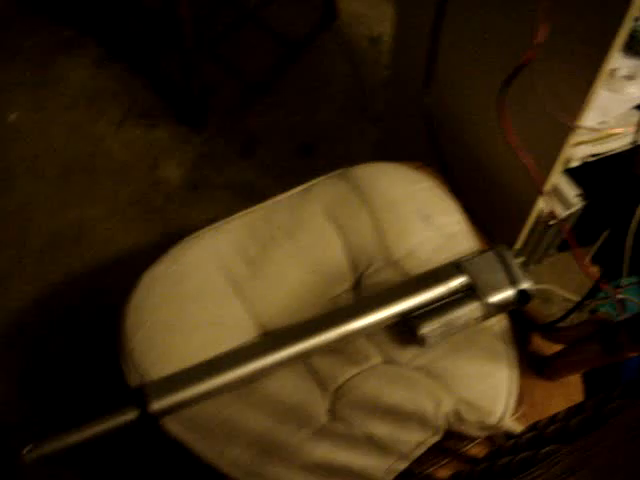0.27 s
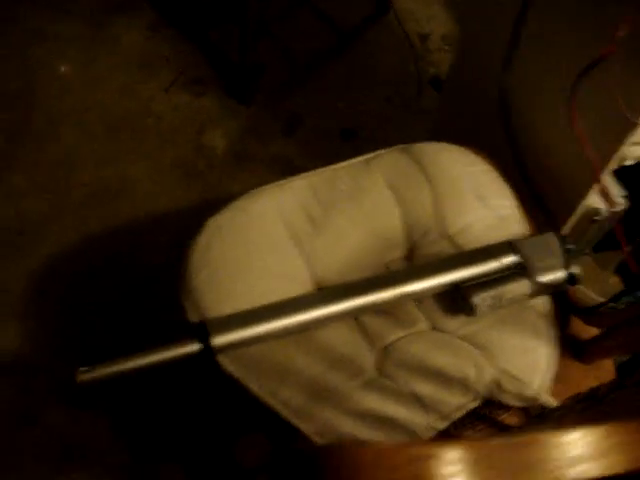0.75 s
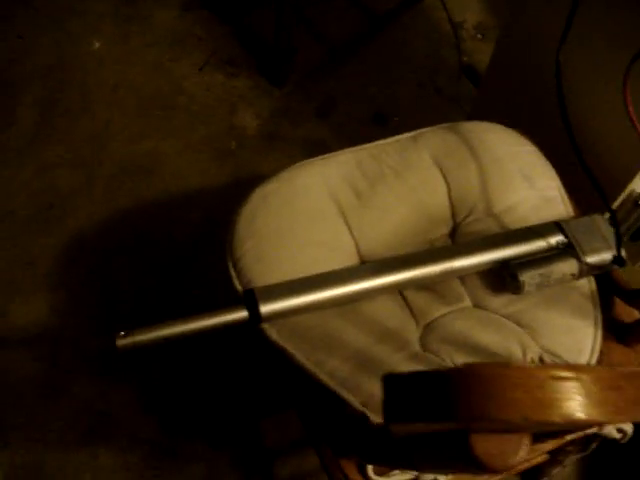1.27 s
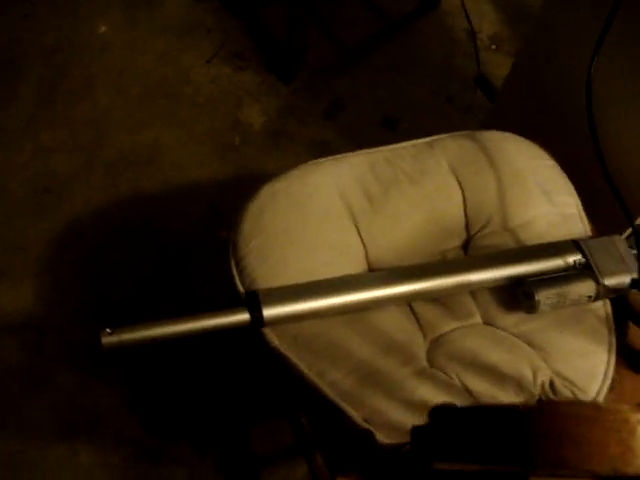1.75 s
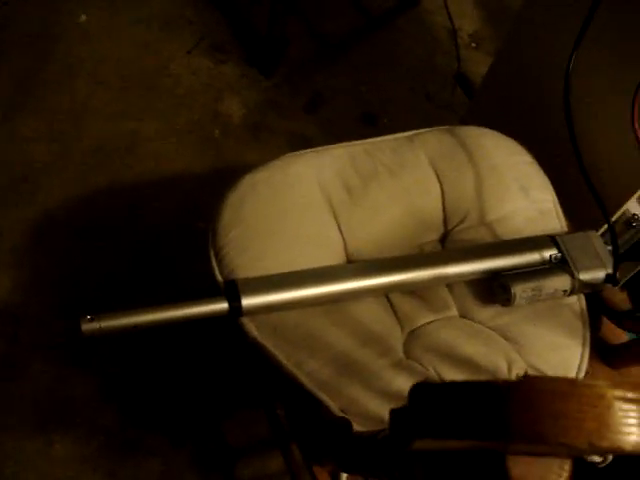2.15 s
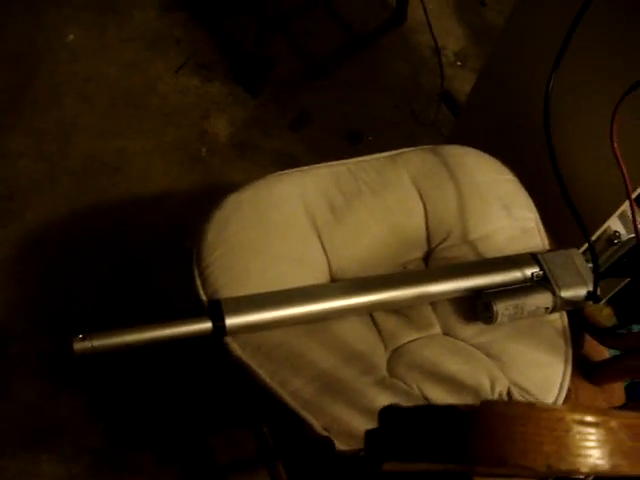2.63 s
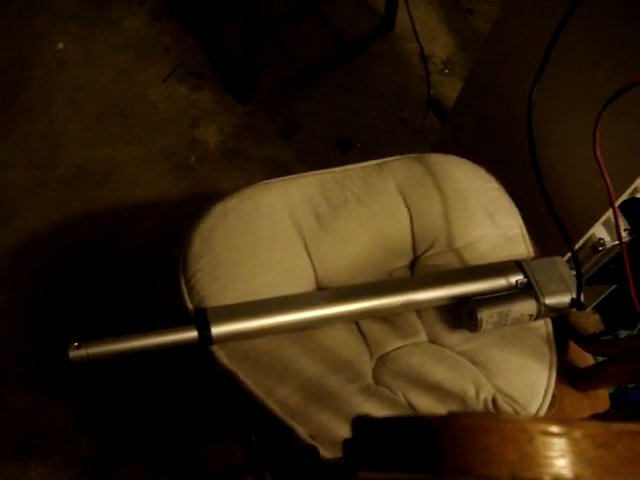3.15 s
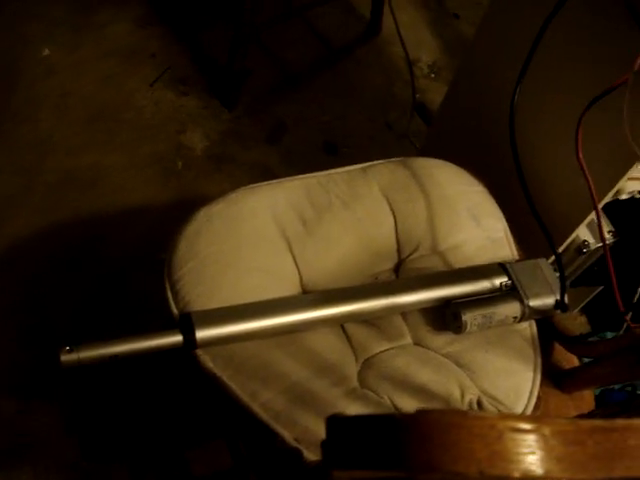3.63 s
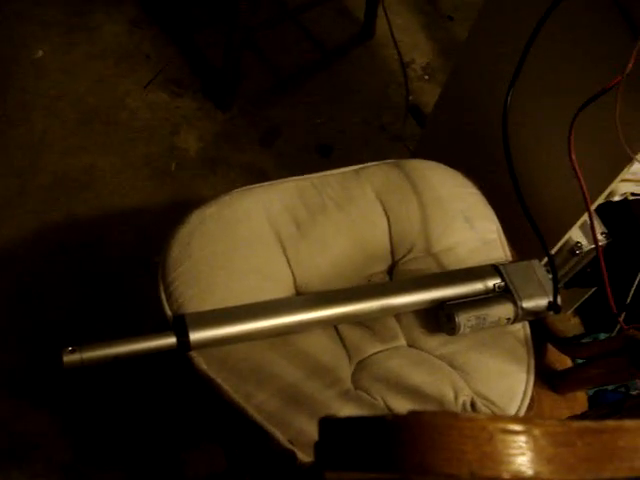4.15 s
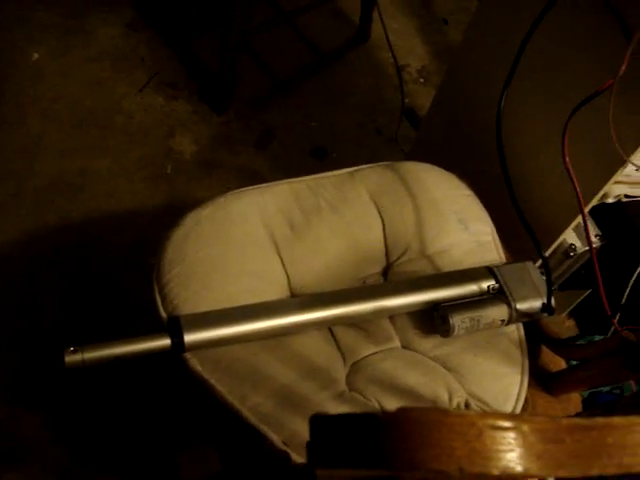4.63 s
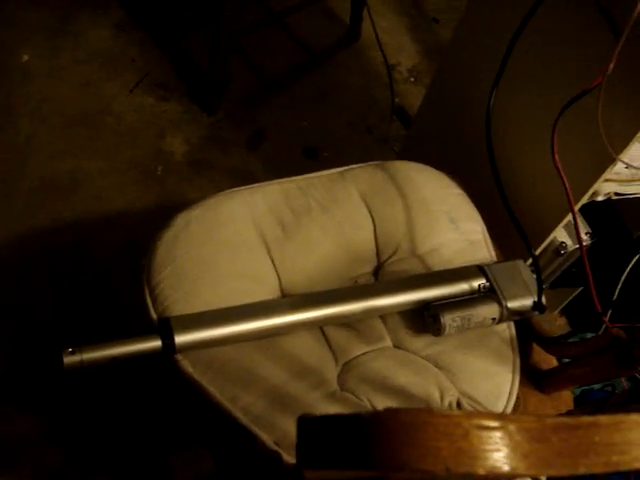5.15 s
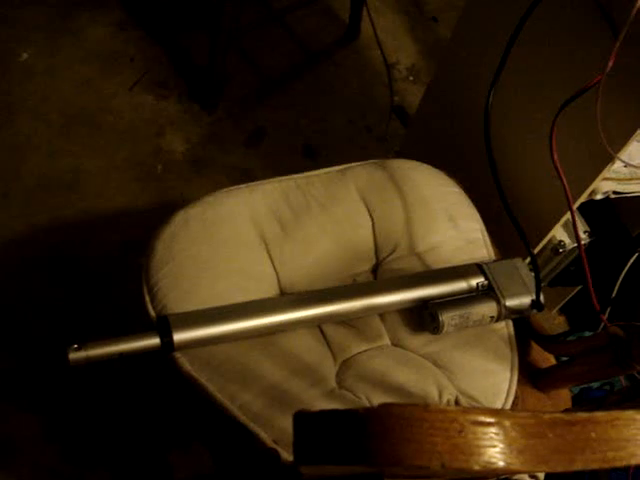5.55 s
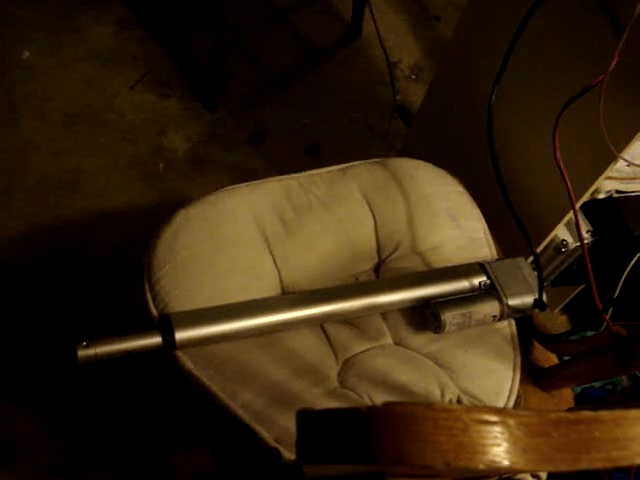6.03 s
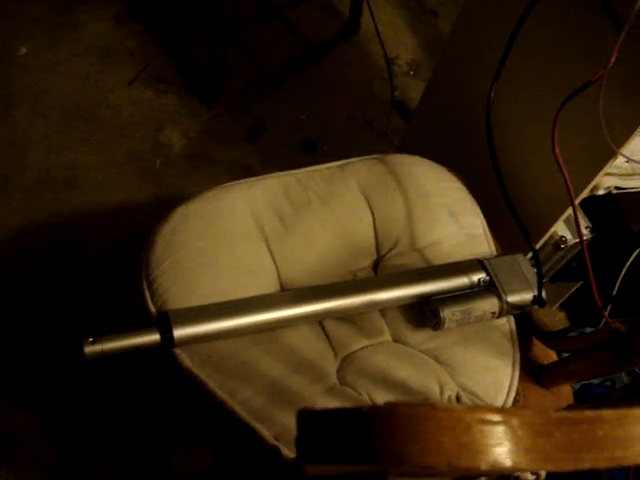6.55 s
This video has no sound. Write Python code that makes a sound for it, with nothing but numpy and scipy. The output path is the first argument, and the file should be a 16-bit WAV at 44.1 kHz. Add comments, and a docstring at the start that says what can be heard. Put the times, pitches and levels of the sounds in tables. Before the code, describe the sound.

From the start, a small electric motor and gear train runs close by indoors, already at full speed. Its shrill, buzzy whine has a strong steady tone near 2.4 kHz, brighter tones above, and a fine metallic rattle from housing and tube. Over the first two seconds its colour and strength shift as the hand-held microphone moves; very soft handling bumps fall near 0.4, 0.9 and 1.1 s. At 1.96 s a switch clacks, two short hard contacts almost together with a slight room echo. The level dips for an instant and the pitch sags minutely, then climbs slightly above before. From about 2.1 s to the end at 7 s the reversed motor whirs continuously, less shrill, with a drone around 600 Hz and a gentle throb five times a second. Two faint, tiny high squeaks come at 5.8 and 6.0 s. Low room rumble lies underneath throughout.

```python
"""A linear actuator on a padded stool indoors pushes its rod out: the motor and gears whine on shaft orders,
and tooth bumps that repeat with each part's turns rattle through housing and tube. Soft bumps of handling.
At 1.96 s a switch clacks in two ringing contacts; the level dips briefly and the shaft speed sags, then climbs.
The rod comes in on the other flanks: slightly faster, less shrill, with a throb once a turn of the screw.
Late on, two faint squeaks of the rod. Room rumble throughout; a hand-held microphone, both channels alike."""
import sys
import numpy as np
from scipy import signal
from scipy.fft import rfft, irfft, next_fast_len
from scipy.io import wavfile
from scipy.ndimage import map_coordinates

SR = 44100
rng = np.random.default_rng(int(sys.argv[2]) if len(sys.argv) > 2 else 0)


def to_wav(sig):
    """Store sig (one row per channel, or 1-D mono) as 16-bit WAV at the path in sys.argv[1].

    Samples outside -1..1 are clipped; the rate is SR.
    """
    pcm = np.clip(np.atleast_2d(sig), -1, 1) * 32767
    pcm = np.round(pcm).astype(np.int16)
    wavfile.write(sys.argv[1], SR, pcm.T)  # frames by channels


N = 299468

# whine of gears and commutator, before trims: (multiple of shaft speed [-], relative level [dB])
OUT_HOUSING_TONES = [(8, -68.5), (12, -66), (16, -64.5), (20, -66), (24, -58.5), (26, -71), (30, -62.5),
                     (34, -64.5), (36, -55.5), (37, -62), (51, -62), (54, -59), (55, -60), (58, -53.5),
                     (59, -54), (60, -47)]
OUT_TUBE_TONES = [(72, -64), (78, -60.5), (94, -60), (98, -56.5), (100, -58), (110, -55), (112, -51),
                  (113, -54.5), (120, -63), (168, -60), (169, -61)]
IN_TONES = [(4, -75), (6, -70.5), (8, -72.5), (9, -69), (10, -78.5), (16, -61), (24, -59.5), (27, -61.5),
            (29, -68.5), (30, -62), (32, -57.5), (32.8, -70.5), (35, -59), (36, -53.5), (42, -65.5),
            (46, -61), (49, -64), (52, -57), (54, -56.5), (55, -58.5), (56, -55), (59, -58), (64, -62.5),
            (67, -58.5), (72, -53.5), (82, -62.5), (84, -63), (89.2, -56), (92, -59), (96, -56), (109, -63),
            (112, -55), (120, -60.5), (126, -63), (147, -64), (151, -70), (166, -59.5), (184, -69)]
IN_DRONE_TONES = [(12, -57.5), (13.2, -60)]
# spectrum of each part: (frequency [Hz], relative density [dB])
OUT_GEARBOX_COLOUR = [(200, -14.5), (400, -10.5), (750, -6.5), (1100, -9), (1450, -6.5), (1800, -2),
                      (2050, -8.5), (2230, -13), (2400, -21)]
OUT_HOUSING_COLOUR = [(2150, -31), (2330, -15), (2600, -6), (2850, -6), (3020, -1), (3130, -4.5),
                      (3260, -15), (3450, -24)]
# the tube's spectrum in three directions, in order of time: (frequency [Hz], relative density [dB])
OUT_TUBE_START_COLOUR = [(3000, -22), (3400, -5), (3800, -7.5), (4300, -2.5), (4650, -12), (5050, -6),
                         (5550, 2), (6200, -8.5), (7100, -9), (8000, -9.5), (8600, 0), (9300, -8),
                         (10000, -11.5)]
OUT_TUBE_SWING_COLOUR = [(3000, -25), (3400, -10.5), (3900, -8), (4300, -6.5), (4750, -1.5), (5200, -4.5),
                         (5450, -2.5), (5650, 3.5), (5850, -5), (6300, -5.5), (6900, -14), (7450, -6),
                         (8150, -13), (9600, -7), (10000, -15)]
OUT_TUBE_SIDE_COLOUR = [(3000, -17), (3400, -5), (3800, -10), (4200, -5.5), (4600, -4.5), (5700, -1.5),
                        (6800, -8.5), (7350, -2), (7850, -9.5), (8400, -3.5), (9100, -4), (10000, -9.5)]
# spectra coming in, and of the room rumble: (frequency [Hz], relative density [dB])
IN_GEARBOX_COLOUR = [(200, -29.5), (420, -15), (800, -12), (1100, -12), (1350, -9.3), (1600, -5.5),
                     (1900, -5.5), (2100, -9.5), (2250, -15), (2450, -8), (2650, -1), (3000, -2),
                     (3100, -10.5), (3400, -19.5)]
IN_TUBE_COLOUR = [(2900, -30), (3200, -9.5), (3400, 0), (3750, -1.5), (4150, -3), (4450, 2), (5200, -1.5),
                  (5700, 2.5), (6100, -5.5), (6800, -5.5), (7350, 0.5), (7900, -7.5), (8700, -7),
                  (9400, -3), (10000, -10.5)]
IN_DRONE_COLOUR = [(480, -50), (570, -22), (610, 7), (670, -3), (710, -0.5), (820, -33)]
ROOM_COLOUR = [(20, -26), (40, -12.5), (60, -8.5), (72, -12.5), (85, -0.5), (102, 0.5), (118, -6),
               (170, -5.5), (280, -4.5), (450, -6.5), (1000, -11.5), (4000, -43)]
# switch contacts: (time [s], relative level [dB], pitch [Hz], t60 [s])
SWITCH_CONTACTS = [(1.956, -31, 1450, 0.035), (1.9718, -30, 1295, 0.026)]
# switch body modes: (ratio to pitch [-], relative level [dB])
SWITCH_BODY_MODES = [(.27, -14), (.44, -8.5), (.66, -6.5), (1, -2), (1.15, -12)]
# soft handling bumps: (time [s], peak level [dB], pitch [Hz])
HANDLING_BUMPS = [(.36, -54.5, 430), (.37, -59, 219), (.86, -58, 262), (1.06, -54, 393)]
# squeaks of the sliding rod: (time [s], peak level [dB], pitch [Hz])
ROD_SQUEAKS = [(5.795, -48, 3440), (5.995, -42, 3480)]
# housing ring going out, before trims: (time [s], relative level [dB])
OUT_HOUSING_LEVEL = [(0, -42), (.55, -39.3), (.9, -43), (1.12, -42.5), (1.45, -41), (1.95, -41.5)]
# tube rattle going out, before trims: (time [s], relative level [dB])
OUT_TUBE_LEVEL = [(0, -40.5), (.25, -40), (.62, -37), (1.0, -38), (1.28, -39.5), (1.95, -39.5)]
# strongest mesh tone going out, through nulls as the microphone moves: (time [s], level [dB])
OUT_MESH_LEVEL = [(0, -46), (.19, -57), (.33, -49.5), (.68, -50.5), (.93, -45.5), (1.28, -43.5),
                  (1.52, -50), (1.95, -49.5)]

REVERSE_S = 1.955
OUT_HZ, IN_HZ = 50.14, 50.665  # shaft speed each way
SAG_HZ, SAG_AFTER_S, SAG_S = .45, .045, .04
CLIMB_AFTER_S, CLIMB_S = .11, .05
MESH_ORDER, SCREW_TURNS = 48, 10  # tooth contacts per shaft turn, shaft turns per screw turn
BIND_OUT_S, BIND_IN_S = 1.02, 4.17  # the screw binds once a turn: one such moment each way
BIND_OUT_DB = .5  # swell of the tube at each bind
SEAT_S, MESH_SEAT_S = .084, .14  # tones firm up as the teeth seat on their new flanks
DIP_DB, DIP_S = 2, .01
ECHO_DB, ECHO_T60_S = -19, .25
TOP_HZ = 10080


def actuator():
    """One shaft drives everything; at the reversal the load changes flanks and the level dips briefly."""
    turns = shaft()
    in_share = .5 + .5 * np.tanh((clock() - REVERSE_S) / .0074)
    second_contact_s = SWITCH_CONTACTS[1][0]
    dip = np.exp(-((clock() - second_contact_s) / DIP_S) ** 2)
    return amp(-DIP_DB * dip) * ((1 - in_share) * pushing(turns) + in_share * pulling(turns))


def pushing(turns):
    """Rod going out: housing and tube ring brightly, changing as the microphone moves round them."""
    housing_db, = curves(OUT_HOUSING_LEVEL)
    tube_db, = curves(OUT_TUBE_LEVEL)
    tube_db = tube_db + BIND_OUT_DB * np.cos(screw_angle(turns, BIND_OUT_S))
    mesh_db, = curves(OUT_MESH_LEVEL)
    teeth = rattle(turns, OUT_HOUSING_TONES + OUT_TUBE_TONES, pinion_db=-7.5, wheel_db=-7.5,
                   screw_db=-13, loose_db=2.5, bite_db=1.5)

    gearbox = amp(-50 + .7 * wobble(9.04)) * coloured(teeth, OUT_GEARBOX_COLOUR)
    housing = amp(housing_db - 4) * coloured(teeth, OUT_HOUSING_COLOUR)
    housing_trim_db = .75 * (housing_db - housing_db.mean()) - .5
    housing_tones = amp(housing_trim_db) * whine(turns, OUT_HOUSING_TONES, waver_db=1.6)

    # the tube radiates a different colour in each direction
    start = np.interp(clock(), [.25, .62], [1, 0])
    side = np.interp(clock(), [1.25, 1.7], [0, 1])
    tube = start * coloured(teeth, OUT_TUBE_START_COLOUR)
    tube += (1 - start - side) * coloured(teeth, OUT_TUBE_SWING_COLOUR)
    tube += side * coloured(teeth, OUT_TUBE_SIDE_COLOUR)
    tube *= amp(tube_db - .47 + .55 * wobble(29.9))
    tube_trim_db = 1.45 * (tube_db - tube_db.max()) + 2.5
    tube_tones = amp(tube_trim_db) * whine(turns, OUT_TUBE_TONES, waver_db=1)

    return gearbox + housing + housing_tones + amp(mesh_db) * mesh(turns) + tube_tones + tube


def pulling(turns):
    """Rod coming in: the gearbox drones and throbs once a turn of the screw."""
    teeth = rattle(turns, IN_TONES + IN_DRONE_TONES, pinion_db=-9, wheel_db=-4.5,
                   screw_db=-9.5, loose_db=-2, bite_db=1.2)
    screw = screw_angle(turns, BIND_IN_S)
    oval = np.cos(4 * screw)  # the slightly oval wheel binds twice in each of its turns

    gearbox_db = settling(first=-42, final=-47.5, lag_s=.092) + .13 * oval
    gearbox = amp(gearbox_db) * coloured(teeth, IN_GEARBOX_COLOUR)
    tube_db = settling(first=-45.9, final=-42.5, lag_s=.7) + 1.04 * oval + .41 * wobble(25)
    tube = amp(tube_db) * coloured(teeth, IN_TUBE_COLOUR)

    hum = whine(turns, IN_DRONE_TONES, waver_db=.5)
    hum += amp(-60.5) * coloured(rng.standard_normal(N), IN_DRONE_COLOUR)
    throb_db = -1.3 * np.cos(screw) - np.cos(2 * screw)
    drone = amp(settling(first=-1.1, final=.6, lag_s=1.6) + throb_db) * hum
    singing = amp(-.54) * whine(turns, IN_TONES, waver_db=.73)
    tones = settling(0, .99, SEAT_S) * (drone + singing)

    mesh_gain = settling(0, 1, MESH_SEAT_S) * amp(settling(first=-47, final=-55, lag_s=1.2))
    return gearbox + tube + mesh_gain * mesh(turns) + tones


def rattle(turns, tones, pinion_db, wheel_db, screw_db, loose_db, bite_db):
    """Pinion, wheel and screw repeat their bumps each turn; backlash adds chance, the load pulses."""
    pinion = amp(pinion_db) * flanks(turns, tones, count=1)
    wheel = amp(wheel_db) * flanks(turns, tones, count=5)
    screw = amp(screw_db) * flanks(turns, tones, count=10)
    backlash = amp(loose_db) * rng.standard_normal(N)
    pulses = [np.cos(2 * np.pi * (order * turns + rng.random())) for order in (1, 2, 3, 6, 12)]
    load = unit(sum(pulses))
    return (pinion + wheel + screw + backlash) * amp(bite_db * load)


def flanks(turns, tones, count):
    """Uneven teeth of a part turning once in count shaft turns: its orders up to 220, less the strong tones."""
    size = 4096 * count  # points round the part
    k = np.arange(220 * count)
    # orders compared in fifths, the turn of the gear wheel
    strong = np.round(5 * np.r_[np.array(tones)[:, 0], MESH_ORDER])
    kept = ~np.isin(5 * k / count, strong)
    ripples = kept * np.exp(2j * np.pi * rng.random(len(k)))
    surface = irfft(ripples, size)
    return unit(np.interp(turns / count % 1 * size, np.arange(size), surface))


def whine(turns, tones, waver_db):
    """Tones locked to the gear wheel (one turn in five of the shaft), each wavering in strength."""
    out, t = np.zeros(N), clock()
    knots = np.linspace(0, t[-1], 40)
    for order, db in tones:
        cycles = turns * np.round(5 * order) / 5
        level = np.interp(t, knots, amp(db + waver_db * rng.standard_normal(len(knots))))
        out += np.sqrt(2) * level * np.sin(2 * np.pi * (cycles + rng.random()))
    return out


def mesh(turns):
    """The strongest tone of the meshing teeth, a sine at rms 1."""
    return np.sqrt(2) * np.sin(2 * np.pi * turns * MESH_ORDER)


def shaft():
    """Turns of the motor shaft: nearly steady speed each way, with a brief sag between."""
    t = clock() - REVERSE_S
    climb = .5 + .5 * np.tanh((t - CLIMB_AFTER_S) / CLIMB_S)
    sag = SAG_HZ * np.exp(-((t - SAG_AFTER_S) / SAG_S) ** 2)
    speed_hz = OUT_HZ + (IN_HZ - OUT_HZ) * climb - sag + .02 * wobble(14)
    return np.cumsum(speed_hz) / SR


def screw_angle(turns, bind_s):
    """Angle of the lead screw [rad], zero where it binds."""
    return 2 * np.pi * (turns - np.interp(bind_s, clock(), turns)) / SCREW_TURNS


def settling(first, final, lag_s):
    """Exponential relaxation from first to final after the reversal; first before it."""
    since_s = np.maximum(clock() - REVERSE_S, 0)
    return final + (first - final) * np.exp(-since_s / lag_s)


def switch():
    """The reversing switch breaks one contact and makes the other: body modes ring under a noise crack."""
    out = np.zeros(N)
    for s, db, hz, t60_s in SWITCH_CONTACTS:
        t = np.maximum(clock() - s, 0)
        ring = sum(amp(level) * np.sin(2 * np.pi * hz * ratio * t) for ratio, level in SWITCH_BODY_MODES)
        crack = .4 * (t > 0) * amp(-60 * t / .0069) * rng.standard_normal(N)
        out += amp(db) * (ring * amp(-60 * t / t60_s) + crack)
    # so small a body radiates little bass
    return filtered(out, lambda hz: hz ** 2 / (hz ** 2 + 300 ** 2))


def in_room(x):
    """x and its short diffuse echo: decaying noise of unit energy."""
    t = np.arange(SR // 2) / SR
    tail = rng.standard_normal(len(t)) * amp(-60 * t / ECHO_T60_S)
    return x + amp(ECHO_DB) * signal.fftconvolve(x, tail / np.linalg.norm(tail))[:N]


def squeaks():
    """The sliding rod squeaks: very narrow noise swells."""
    return bursts(ROD_SQUEAKS, width=.04, half_s=.01)


def handling():
    """Soft handling bumps: low, broader noise swells."""
    return bursts(HANDLING_BUMPS, width=.54, half_s=.025)


def bursts(rows, width, half_s):
    """Gaussian swells of band noise, width a share of pitch; half_s is the time to fall to 1/e."""
    out = np.zeros(N)
    for s, db, hz in rows:
        points = [(hz / (1 + width), -12), (hz, 0), (hz * (1 + width), -12)]
        band = coloured(rng.standard_normal(N), points)
        out += amp(db) * band * np.exp(-((clock() - s) / half_s) ** 2)
    return out


def room_rumble():
    """Steady noise of the room, mostly bass."""
    return amp(-60) * coloured(rng.standard_normal(N), ROOM_COLOUR)


def amp(db):
    """Decibels to gain."""
    return 10 ** (np.asarray(db) / 20)


def unit(x):
    """Scale to rms 1."""
    return x / np.sqrt(np.mean(x ** 2) + 1e-20)


def clock():
    """Time of each sample [s]."""
    return np.arange(N) / SR


def curves(rows):
    """One value per sample for each column after the time."""
    s, *cols = np.transpose(rows)
    return [np.interp(clock(), s, c) for c in cols]


def wobble(rate_hz):
    """A smooth random curve, rate_hz knots a second."""
    knots = rng.standard_normal(int(N * rate_hz / SR) + 4)
    return map_coordinates(knots, [clock() * rate_hz])


def filtered(x, response):
    """x times a response of frequency [Hz]."""
    m = next_fast_len(N + 8192)
    return irfft(rfft(x, m) * response(np.fft.rfftfreq(m, 1 / SR)), m)[:N]


def coloured(x, points):
    """x through (frequency [Hz], level [dB]) points, steep at both ends, at rms 1."""
    f, db = np.transpose(points)
    f = np.r_[f[0] / 2, f, f[-1] * 2]
    db = np.r_[-120, db, -120]
    return unit(filtered(x, lambda hz: amp(np.interp(np.log(hz + 1), np.log(f), db))))


def scene():
    """Actuator, switch, squeaks, handling and room rumble, the same in both channels."""
    mono = actuator() + in_room(switch()) + squeaks() + handling() + room_rumble()
    return np.array([mono, mono])


def record(dry):
    """Steep low-pass: nothing is heard above TOP_HZ."""
    return np.array([filtered(x, lambda hz: 1 / (1 + (hz / TOP_HZ) ** 300)) for x in dry])


dry = scene()
out = record(dry)
to_wav(out)
```